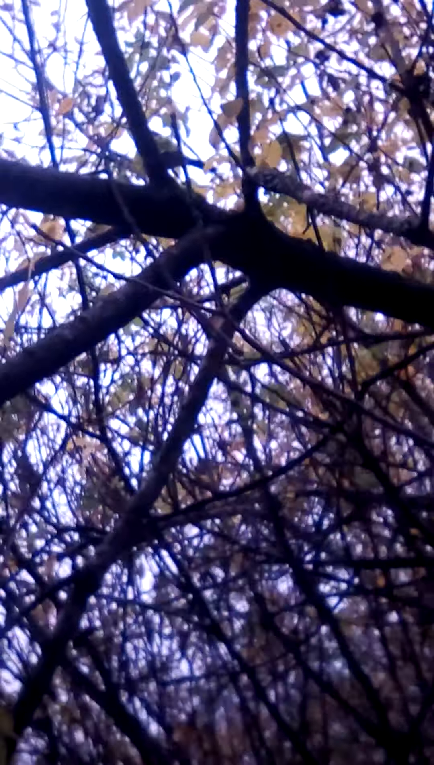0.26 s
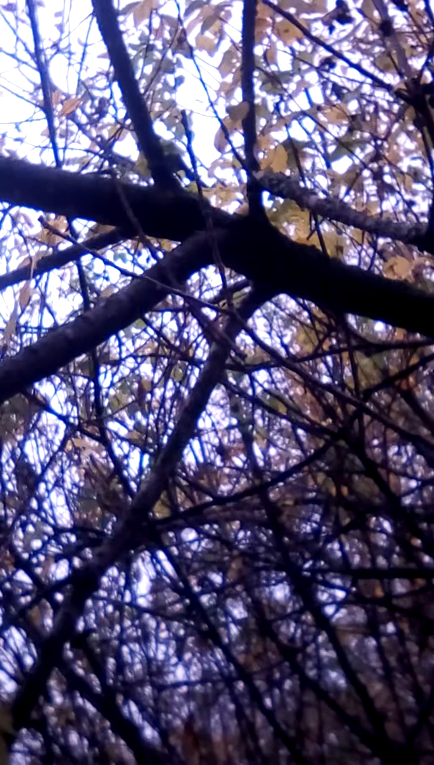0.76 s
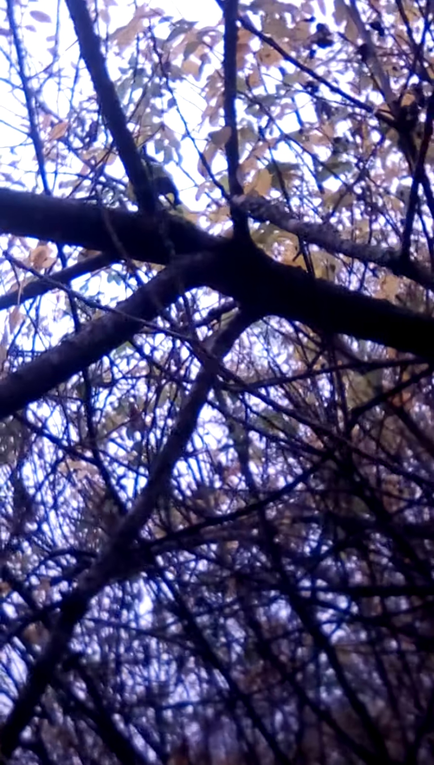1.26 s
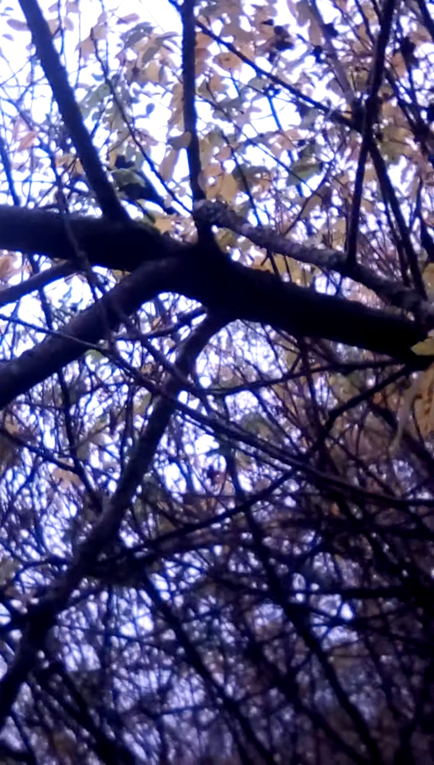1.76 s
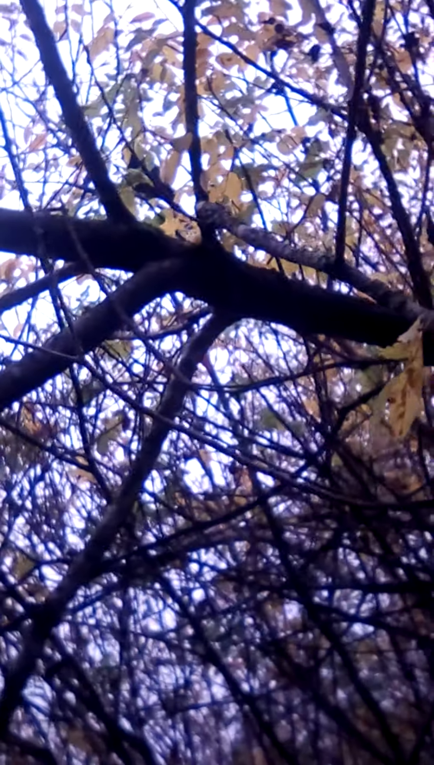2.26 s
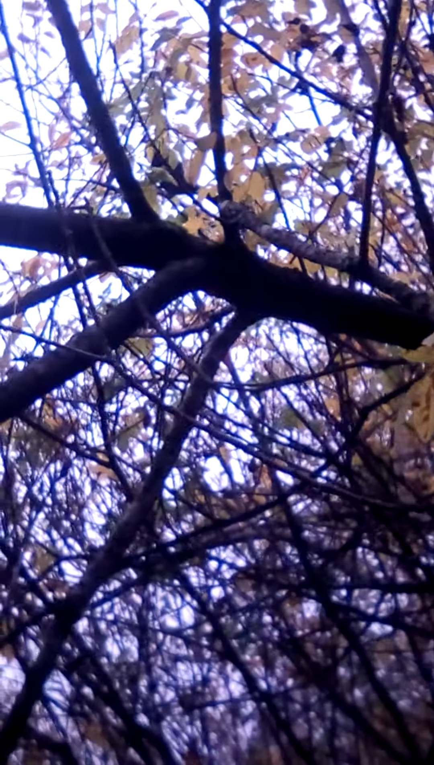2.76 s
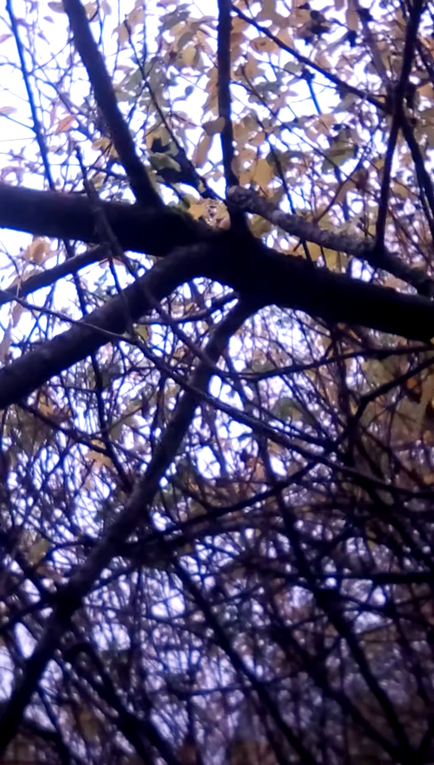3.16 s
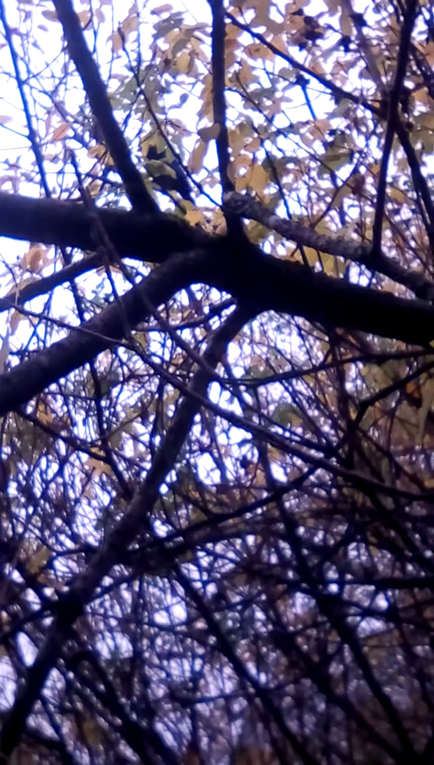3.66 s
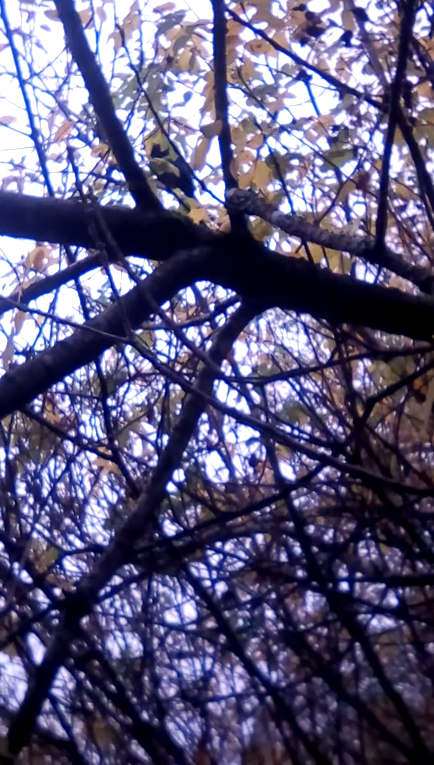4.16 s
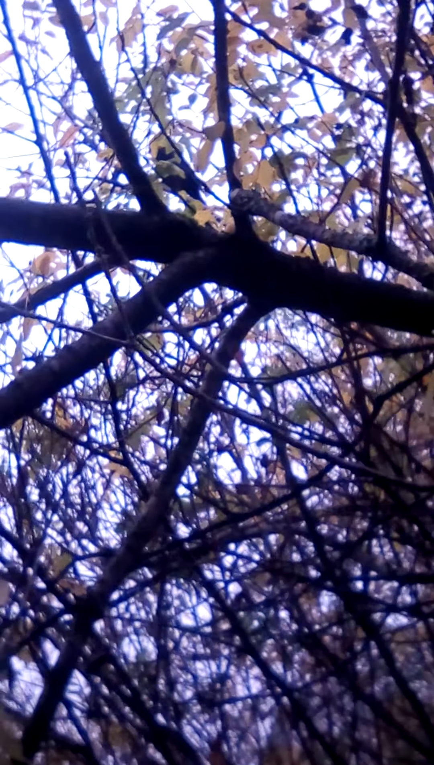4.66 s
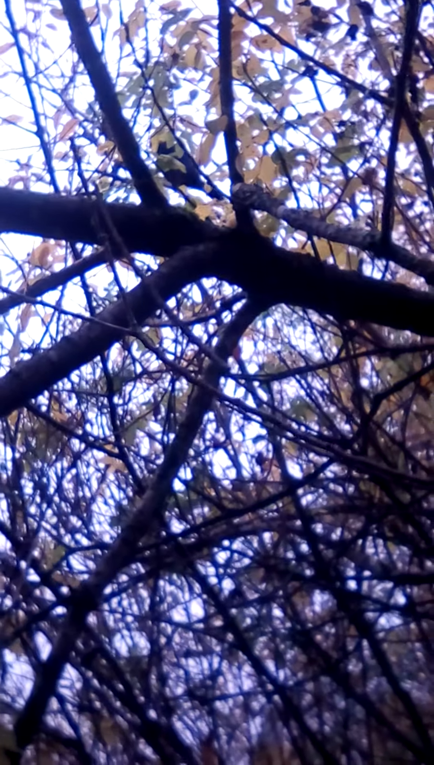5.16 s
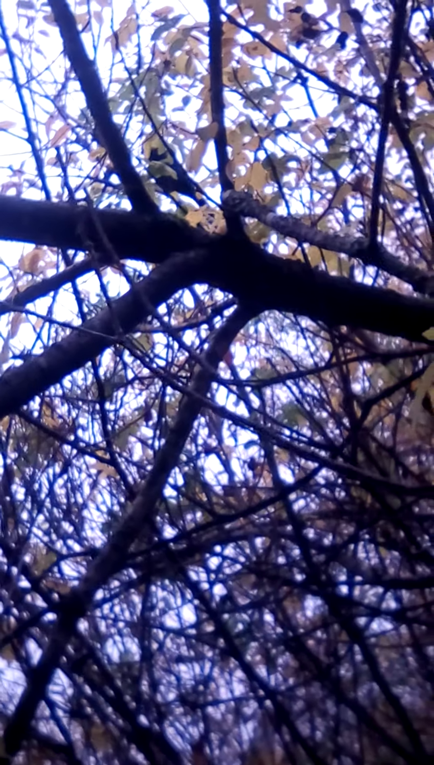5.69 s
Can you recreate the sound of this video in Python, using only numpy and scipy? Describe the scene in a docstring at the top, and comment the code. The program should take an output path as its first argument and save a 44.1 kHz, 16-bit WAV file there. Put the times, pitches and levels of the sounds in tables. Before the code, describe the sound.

Three bursts of rapid, raspy, evenly spaced jay calls echo lightly among trees, with faint faraway road noise underneath.

```python
"""A jay scolds from an autumn tree in three quick runs of short, harsh calls, about seven a second.
Each call is an arched whistle from one side of the syrinx, a weaker voice above it, and a closing
rasp of slapping membranes; the trees scatter it back. Distant traffic rumbles, the tyre noise of
one far car swells and fades, and a far bird chirps faintly in the first pause.
There is one brief low thump and a faint high hiss."""
import sys
import numpy as np
from scipy import signal
from scipy.fft import rfft, irfft
from scipy.io import wavfile

SR = 44100
rng = np.random.default_rng(int(sys.argv[2]) if len(sys.argv) > 2 else 0)


def transcribe(signal):
    """Save signal, clipped to [-1, 1], as a 16-bit WAV file at the path in sys.argv[1]."""
    frames = np.atleast_2d(signal).T
    limited = np.clip(frames, -1, 1)
    pcm = np.round(limited * 32767).astype(np.int16)
    wavfile.write(sys.argv[1], SR, pcm)


N = 261513
TIME = np.arange(N) / SR


def from_db(db):
    """Decibels to amplitude."""
    return 10 ** (np.asarray(db) / 20)


def unit_rms(x):
    """Scale to rms 1."""
    return x / np.sqrt(np.mean(np.abs(x) ** 2) + 1e-20)


def follow(curve, t=TIME):
    """Interpolate (time, value) rows at t."""
    return np.interp(t, *np.transpose(curve))


def colour(x, spectrum):
    """Filter by (frequency, gain) rows."""
    hz, db = np.transpose(spectrum)
    mirrored = np.concatenate([x, x[::-1]])   # ends join smoothly
    bin_hz = np.maximum(np.arange(len(x) + 1) * SR / len(mirrored), 1)
    gain = from_db(np.interp(np.log(bin_hz), np.log(hz), db))
    return irfft(rfft(mirrored) * gain)[:len(x)]


def noise(spectrum):
    """Steady coloured noise, rms 1."""
    return unit_rms(colour(rng.standard_normal(N), spectrum))


def lowpass(x, hz):
    """Two cascaded one-pole low-passes."""
    pole = np.exp(-2 * np.pi * hz / SR)
    return signal.lfilter([(1 - pole) ** 2], [1, -2 * pole, pole * pole], x)


def wobble(size, hz):
    """Low-passed random wavering, rms 1."""
    return unit_rms(lowpass(rng.standard_normal(2 * size), hz)[size:])


def phase(hz):
    """Running phase of a moving pitch, random start."""
    return 2 * np.pi * np.cumsum(hz) / SR + rng.uniform(0, 2 * np.pi)


def voice(hz, rough):
    """A sine whose pitch and amplitude shake with roughness."""
    shaken_hz = hz * (1 + 0.0618 * rough * wobble(len(hz), hz=500))
    flutter = 1 + rough * wobble(len(hz), hz=440)
    return np.sqrt(2) * np.sin(phase(shaken_hz)) * flutter


def resonate(x, hz, width_hz):
    """Resonance of nominal width whose centre may move, rms 1."""
    carrier = np.exp(1j * phase(hz * np.ones(len(x))))
    baseband = lowpass(x * carrier.conj(), 0.62 * width_hz)
    return unit_rms((baseband * carrier).real)


def envelope(t, hold_s, attack_s, release_s):
    """Full level over hold_s = (from, until); 30 dB per attack or release time outside."""
    before = np.maximum(hold_s[0] - t, 0) / attack_s
    after = np.maximum(t - hold_s[1], 0) / release_s
    return from_db(-30 * (before + after))


def around(time_s):
    """Mask of the samples near a moment, and their times from it."""
    near = np.abs(TIME - time_s) < 0.08
    return near, TIME[near] - time_s


def noise_band(level_db, spectrum):
    """One band of background noise, wavering slightly."""
    return from_db(level_db + 0.67 * wobble(N, hz=3.4)) * noise(spectrum)


# high hiss: (frequency [Hz], relative density [dB])
HIGH_HISS_SPECTRUM = [(2500, -31), (4000, -3.5), (4700, 1), (5700, 1.5), (6600, -8.5), (7200, -11),
                      (9000, -22.5)]
# its contour: (time [s], level [dB])
HIGH_HISS_CONTOUR = [(0, -72), (1, -78.5), (2.2, -77.5), (3, -76), (3.5, -72), (4.3, -74), (4.8, -72.5),
                     (5.93, -65)]


def high_hiss():
    """A faint high hiss, strongest during the last run of calls."""
    return noise_band(follow(HIGH_HISS_CONTOUR), HIGH_HISS_SPECTRUM)


# low rumble: (frequency [Hz], relative density [dB])
RUMBLE_SPECTRUM = [(20, -27.5), (35, -9), (55, -2.5), (95, 0.5), (130, -3.5), (180, -7), (260, -12.5),
                   (350, -19.5), (600, -24.5), (1200, -56)]


def rumble():
    """A steady, wavering low rumble, with one brief low thump."""
    thump_s, width_s = 3.9, 0.049
    thump_db = 5.5 * np.exp(-((TIME - thump_s) / width_s) ** 2)
    return noise_band(-44.5 + 0.06 * wobble(N, hz=3.8) + thump_db, RUMBLE_SPECTRUM)


# tyre bands: (frequency [Hz], relative density [dB])
ROAR_SPECTRUM = [(200, -4), (380, -8), (600, -3), (830, -1.5), (1020, 0), (1350, -3), (1700, -7.5),
                 (2100, -16.5), (3000, -22.5), (5000, -47.5)]
HISS_SPECTRUM = [(1200, -14.5), (1900, -1.5), (2600, 1), (3400, -5.5), (4200, -8.5), (5500, -27)]
# tyre roar: (time [s], relative level [dB])
ROAR_CONTOUR = [(0.0, -58.5), (0.73, -58), (1.09, -54.5), (1.25, -51.5), (2.13, -48.5), (2.87, -48.5),
                (3.29, -51), (3.73, -50.5), (4.59, -53), (5.93, -50)]


def tyres():
    """A far car passes: tyre roar swells first, its hiss a little later."""
    peak_s, approach_s, recede_s = 3.45, 0.7, 0.5   # hiss peak; half-power times either side
    away = (TIME - peak_s) / np.where(TIME < peak_s, approach_s, recede_s)
    hiss_db = -58 - 10 * np.log10(1 + away ** 2)
    return noise_band(follow(ROAR_CONTOUR) + 1.94, ROAR_SPECTRUM) + noise_band(hiss_db, HISS_SPECTRUM)


# chirps: (onset [s], length [s], start pitch [Hz], end pitch [Hz], level [dB])
FAR_BIRD_NOTES = [(1.723, .05, 7400, 7300, -80), (1.81, 0.057, 5650, 5560, -77),
                  (1.795, 0.064, 3900, 4180, -66), (1.84, 0.069, 4270, 4600, -72),
                  (1.853, 0.11, 3940, 3900, -68), (1.956, 0.092, 3800, 3660, -67),
                  (2.227, 0.11, 3400, 3220, -70)]


def far_bird():
    """Thin gliding notes of a distant bird."""
    out = np.zeros(N)
    for onset_s, length_s, start_hz, end_hz, db in FAR_BIRD_NOTES:
        during = (TIME > onset_s) & (TIME < onset_s + length_s)
        size = during.sum()
        glide_hz = np.linspace(start_hz, end_hz, size)
        out[during] += from_db(db) * np.hanning(size) * voice(glide_hz, rough=0.49)
    return out


# scatter from the trees: (frequency [Hz], gain [dB])
ECHO_RESPONSE = [(1000, -15), (2300, -15), (3300, -0.5), (4300, -6), (6000, 4), (8000, -18.5)]


def tree_echoes(x, early_t60_s, late_t60_s, late_db):
    """Near branches scatter a quick spray of echoes, the wood behind a faint long tail."""
    t = TIME[:SR]
    decay = from_db(-60 * t / early_t60_s) + from_db(late_db - 60 * t / late_t60_s)
    impulse_response = unit_rms(rng.standard_normal(SR) * decay * (t > 0.005)) / np.sqrt(SR)
    return colour(signal.fftconvolve(x, impulse_response), ECHO_RESPONSE)[:N]


def squeak(t):
    """A short, slightly sagging note with a weak octave."""
    hz = 4250 - 6500 * t
    tone = voice(hz, rough=0.29) + from_db(-14.5) * voice(2 * hz, rough=0.5)
    return tone * envelope(t, hold_s=(0, 0.016), attack_s=0.004, release_s=0.011)


def lead_in(t):
    """Two soft voices part from one pitch; the throat damps the upper one as it climbs."""
    low_hz, top_hz, climb_s = 1757, 3084, 0.025
    high_hz = top_hz - (top_hz - low_hz) * np.clip(-t / climb_s, 0, 1) ** 2
    throat_gain = np.interp(high_hz, [2750, 3050], [1, 0.1])
    high = from_db(-2) * throat_gain * voice(high_hz, rough=0.26)
    low = from_db(-1) * voice(np.full(len(t), low_hz), rough=0.59)
    return (low + high) * envelope(t, hold_s=(-0.018, 0.0013), attack_s=0.017, release_s=0.011)


def upper_voice(t):
    """A rough voice above the whistle, sagging linearly."""
    tone = voice(3038 - 21000 * t, rough=0.53)
    return tone * envelope(t, hold_s=(0.01, 0.038), attack_s=0.025, release_s=0.0077)


def slaps(whistle_hz, cycles_per_slap, jitter, air):
    """The membranes slap shut unevenly every few whistle cycles, with turbulent air between."""
    size = len(whistle_hz)
    rate_hz = whistle_hz / cycles_per_slap * np.exp(jitter * wobble(size, hz=400))
    count = np.floor(np.cumsum(rate_hz) / SR)
    pulses = np.diff(count, prepend=0) * rng.uniform(0.57, 1, size)
    return unit_rms(pulses) + air * rng.standard_normal(size)


def beak_overtone(t, pulses):
    """Slaps ring thinly at the beak around the crest."""
    ring = resonate(pulses, hz=6640, width_hz=400)
    ring += from_db(-7.5) * resonate(pulses, hz=4960, width_hz=250)
    return ring * envelope(t, hold_s=(-0.011, 0.0021), attack_s=0.023, release_s=0.0055)


# static throat and beak resonances: (centre [Hz], nominal width [Hz], relative level [dB])
RASP_FORMANTS = [(1700, 700, -5), (2900, 700, -3), (5150, 600, -7), (6450, 900, -8)]


def rasp(t, pulses, whistle_hz):
    """Slaps ring in throat and beak; ragged overtones slide down with the whistle."""
    throat_hz = np.interp(t, [0.015, 0.03], [3570, 4325])   # climbs as the call closes
    throat = resonate(pulses, throat_hz, width_hz=560)
    formants = sum(from_db(db) * resonate(pulses, hz, width_hz) for hz, width_hz, db in RASP_FORMANTS)
    octave = from_db(-4.5) * voice(2 * whistle_hz, rough=0.3)
    twelfth = from_db(-14.5) * voice(3 * whistle_hz, rough=0.3)
    overtones = (octave + twelfth) * np.interp(t, [0.004, 0.012], [0, 1])
    gain = envelope(t, hold_s=(0.012, 0.033), attack_s=0.035, release_s=0.014)
    return gain * (throat + formants + overtones)


def whistle_pitch(t, crest_hz):
    """A quick leap to the crest, a slower sag and a last droop, with random wander."""
    start_hz, end_hz, mean_crest_hz = 1763, 1587, 2652
    rise_s = 0.0077 + 1e-5 * (crest_hz - mean_crest_hz)   # higher crests take longer
    fall_s, droop_from_s, droop_hz_per_s = 0.0105, 0.029, 28000
    rise_hz = start_hz + (crest_hz - start_hz) * np.exp(-np.abs(t / rise_s) ** 3)
    fall_hz = end_hz + (crest_hz - end_hz) / (1 + np.abs(t / fall_s) ** 1.453)
    droop_hz = droop_hz_per_s * np.maximum(t - droop_from_s, 0)
    wander = 1 + 0.01225 * wobble(len(t), hz=60)
    return np.where(t < 0, rise_hz, fall_hz - droop_hz) * wander


# whistle shake: (unstretched time from crest [s], roughness [0-1])
WHISTLE_ROUGHNESS = [(.004, .15), (.025, 0.37)]


def whistle(t, hz):
    """Clean rising, rougher falling; loudest as it sweeps through the windpipe's resonance."""
    pipe_hz, width_hz = 2333, 243
    pipe_db = -7 + 10 * np.exp(-((hz - pipe_hz) / width_hz) ** 2)
    tone = from_db(pipe_db) * voice(hz, rough=follow(WHISTLE_ROUGHNESS, t))
    return tone * envelope(t, hold_s=(-0.0109, 0.028), attack_s=0.007, release_s=0.016)


def call(t, crest_hz, whistle_db, lead_db, rasp_db):
    """Lead-in and thin overtone, arched whistle, then upper voice and rasp; t = 0 at the crest."""
    hz = whistle_pitch(t, crest_hz)
    pulses = slaps(hz, cycles_per_slap=3, jitter=0.09, air=0.35)
    overtone_db = -67.5 + 3.5 * (whistle_db + 37)   # grows steeply with effort
    upper_db = (whistle_db + rasp_db) / 2 - 6.5
    return (from_db(lead_db) * lead_in(t)
            + from_db(overtone_db) * beak_overtone(t, pulses)
            + from_db(whistle_db) * whistle(t, hz)
            + from_db(upper_db) * upper_voice(t)
            + from_db(rasp_db - 4.5) * rasp(t, pulses, hz))


# calls: (crest time [s], crest pitch [Hz], fall stretch [ratio],
#         whistle gain [dB], lead-in gain [dB], relative rasp gain [dB])
JAY_CALLS = [(-0.014, 2603, 0.89, -35.5, -47, -45), (0.1194, 2658, 0.81, -36, -48.5, -46),
             (0.2661, 2613, 1.04, -33.5, -46.5, -47), (0.403, 2548, .87, -33.3, -50.5, -46),
             (0.557, 2697, 0.96, -37, -49.5, -48), (0.7025, 2724, 1.13, -39, -50.5, -54),
             (2.451, 2774, 0.83, -35.5, -45, -43.5), (2.5829, 2600, 0.91, -35, -46.5, -45),
             (2.729, 2790, 0.93, -36, -51, -45), (2.87, 2560, 1.11, -35.7, -47.5, -47),
             (3.023, 2590, 0.97, -39, -48.5, -47.5), (3.181, 2660, 1.02, -37, -47, -48),
             (4.977, 2650, .98, -35, -53, -43.5), (5.1129, 2616, .86, -36, -43, -46),
             (5.25, 2660, 1, -34, -45.5, -44.5), (5.4005, 2674, 1.07, -36, -44.5, -43),
             (5.5455, 2685, 1.08, -35.5, -47.5, -46), (5.6883, 2604, 0.92, -37, -46, -45.5),
             (5.8428, 2577, 1.02, -36, -49, -45)]
# squeaks ending a few hard calls: (time [s], level [dB])
JAY_SQUEAKS = [(2.468, -53), (2.748, -48.5), (4.998, -42.5), (5.566, -51)]


def jay():
    """One repeated gesture, time-scaled after its crest; some calls break into a squeak."""
    out = np.zeros(N)
    for crest_s, crest_hz, stretch, *gains_db in JAY_CALLS:
        near, t = around(crest_s)
        gesture_t = np.where(t < 0, t, t / stretch)
        out[near] += call(gesture_t, crest_hz, *gains_db)
    for time_s, db in JAY_SQUEAKS:
        near, t = around(time_s)
        out[near] += from_db(db) * squeak(t)
    return out


def scene():
    """Both birds and their echoes over the background, mono."""
    birds = jay() + far_bird()
    echoes = tree_echoes(birds, early_t60_s=0.18, late_t60_s=0.83, late_db=-22)
    return (rumble() + tyres() + high_hiss() + echoes + birds)[None]


# microphone response: (frequency [Hz], gain [dB])
MIC_RESPONSE = [(6600, 0), (7000, -6.5), (7400, -8), (7900, -23.5), (8500, -19.5), (9300, -16),
                (10200, -39), (12000, -50.5)]
# recorder hiss: (frequency [Hz], relative density [dB])
SELF_NOISE_SPECTRUM = [(100, 9), (13800, -1.5), (14700, 9), (15800, 6.5)]


def record(dry):
    """Narrow-band microphone, faint recorder hiss and a steep top cut."""
    cutoff_hz, fade_in_s = 15760, 0.004
    heard = colour(dry[0], MIC_RESPONSE) + from_db(-80.5) * noise(SELF_NOISE_SPECTRUM)
    heard *= np.minimum(TIME / fade_in_s, 1)
    top_cut = signal.ellip(12, 0.1, 80, cutoff_hz, fs=SR, output="sos")
    return signal.sosfilt(top_cut, heard)[None]


dry = scene()
out = record(dry)
transcribe(out)
```